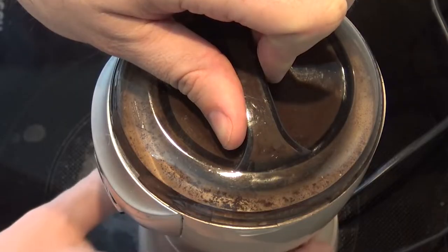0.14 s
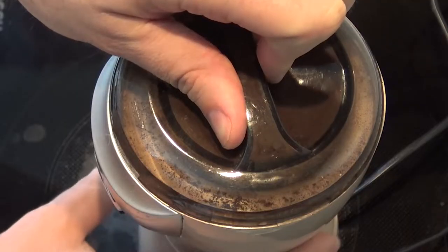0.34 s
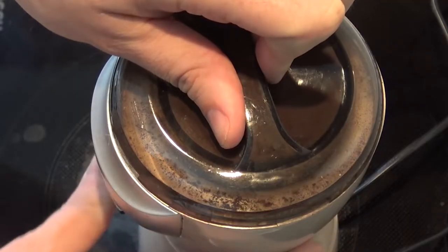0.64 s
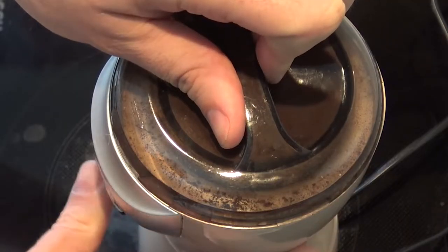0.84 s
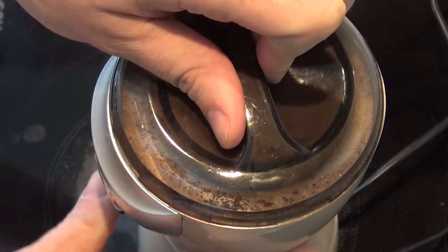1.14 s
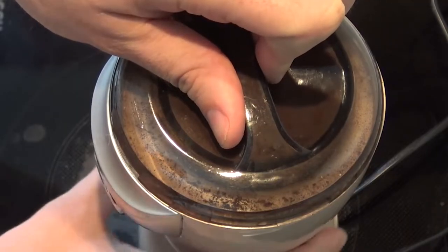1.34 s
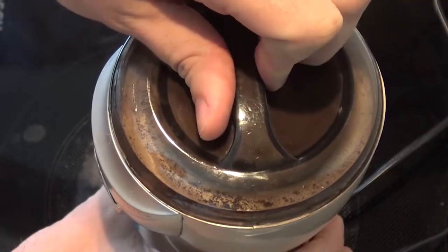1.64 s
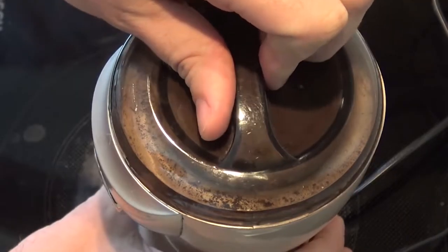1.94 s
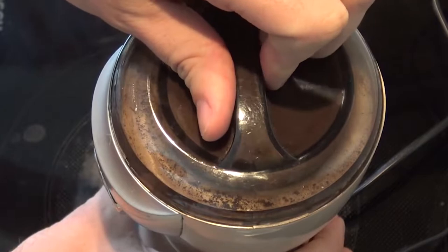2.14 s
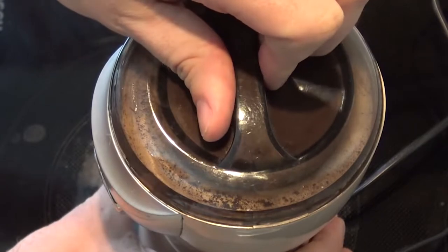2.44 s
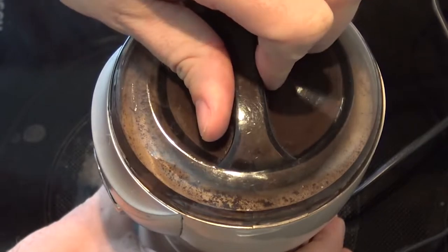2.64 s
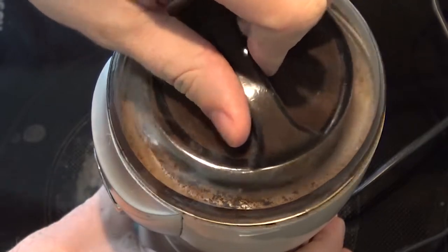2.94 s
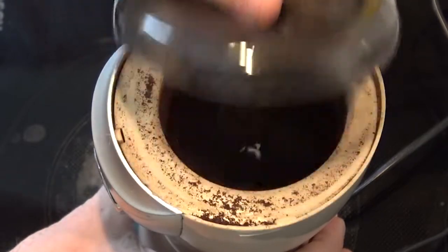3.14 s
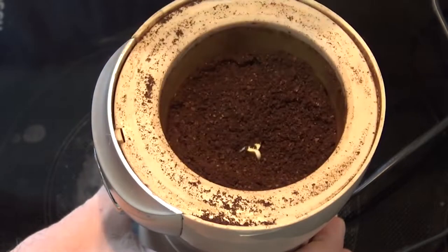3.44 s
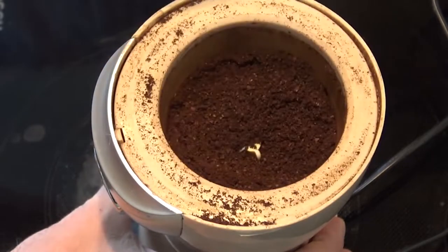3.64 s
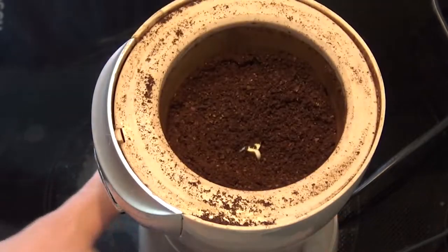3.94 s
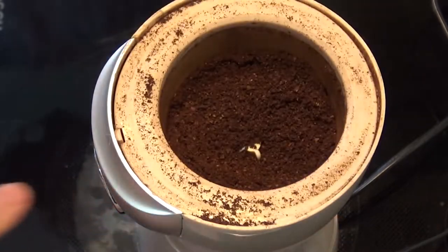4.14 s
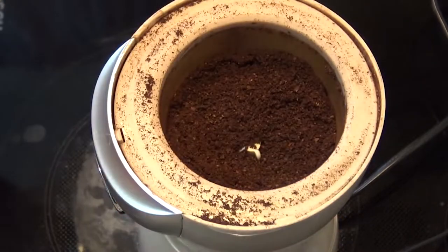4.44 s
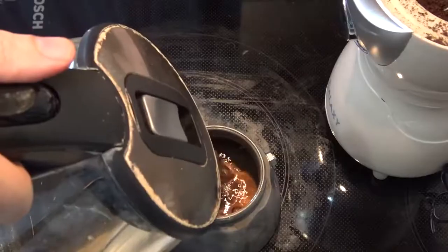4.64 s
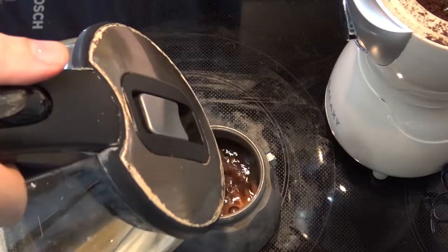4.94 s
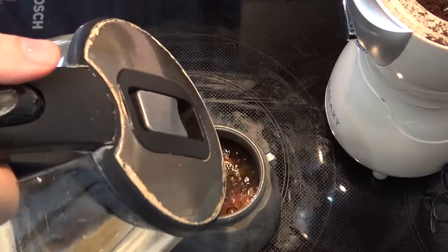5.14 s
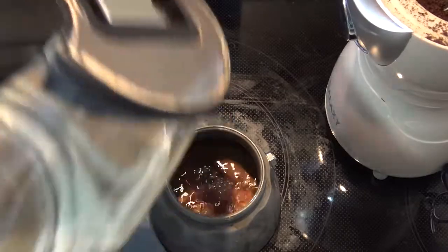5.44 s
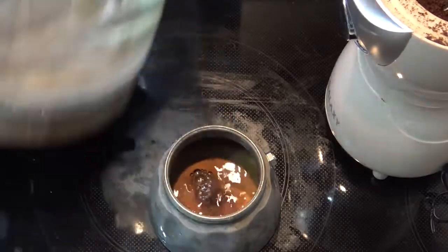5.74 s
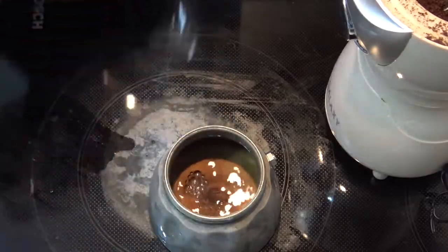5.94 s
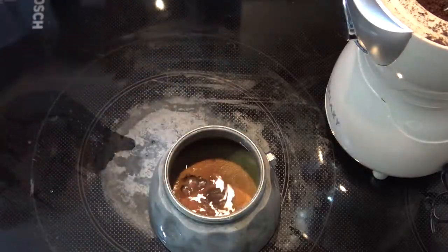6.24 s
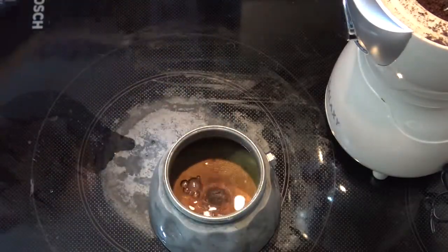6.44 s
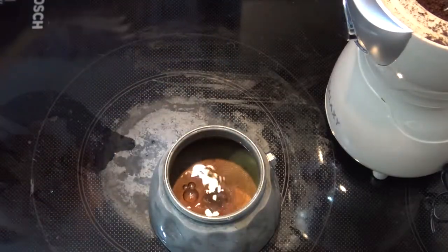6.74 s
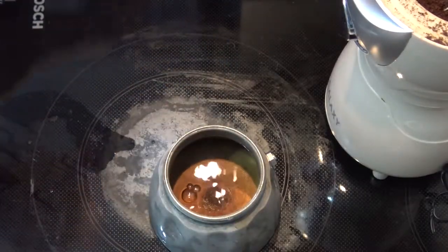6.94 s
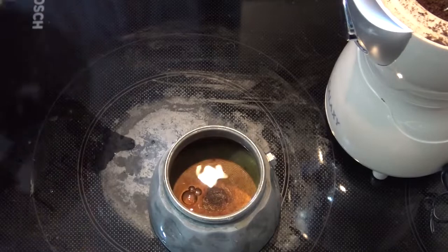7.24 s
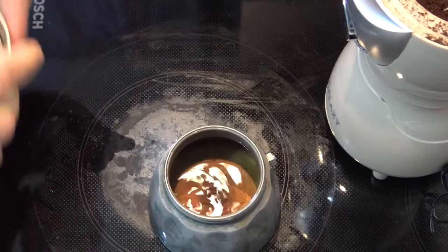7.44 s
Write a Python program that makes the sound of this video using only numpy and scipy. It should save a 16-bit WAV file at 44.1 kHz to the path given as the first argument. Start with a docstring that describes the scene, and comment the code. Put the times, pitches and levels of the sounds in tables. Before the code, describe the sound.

A small electric coffee grinder runs close to the microphone, humming and whining over gritty swirling grounds. It clicks off, rattles and winds down with knocks. Its plastic lid clicks free and is set down with a clack. Hot water splashes and plops into a small pot in two short bursts, fizzing lightly. A kettle lands with heavy, low knocks, followed by a very faint metallic slide. Small kitchen, short reverberation, low room noise.

```python
"""First a blade coffee grinder whirs close by, is switched off and coasts to a stop: shaft orders, gritty noise and knocks.
Its plastic lid is pulled off and laid down, as struck modes and a dusty drag.
Hot water is tipped from a kettle onto the grounds in a small pot: noise slaps and ringing bubbles splash, plop and fizz.
The kettle is set down with three heavy knocks, each with a softer rebound; then something metal slides faintly.
A small kitchen answers with early reflections and a diffuse tail, over low room noise and hiss."""
import sys
import numpy as np
from scipy import signal
from scipy.fft import rfft, irfft, next_fast_len
from scipy.io import wavfile
from scipy.ndimage import map_coordinates

SR = 44100
rng = np.random.default_rng(int(sys.argv[2]) if len(sys.argv) > 2 else 0)


def store_wav(level_fs):
    """Save 16-bit WAV to argv[1]."""
    pcm = np.round(np.clip(np.atleast_2d(level_fs), -1, 1) * 32767)
    wavfile.write(sys.argv[1], SR, pcm.T.astype(np.int16))


N = 335160
TIME = np.arange(N) / SR  # s, the whole scene
AGE = np.arange(SR // 2) / SR  # s, since a single sound began

# All table levels are relative: each layer is balanced further in the mix.
# Running grinder
OFF_S, SHAFT_HZ, MAINS_HZ = 1.563, 341.6, 50  # the switch opens; full speed; supply frequency
# whine of the shaft: order, level/dB
WHINE = [(4, -41.5), (5, -30.5), (6, -31.5), (8, -44), (10, -37), (12, -41), (14, -45), (20, -44),
         (30, -45.5)]
# orders shifted by the mains ripple: f/Hz, level/dB
SIDE_LINES = [(1125, -43.5), (1266, -49), (1466, -55), (1808, -56), (2150, -41.5), (2291, -43),
              (3174, -42.5), (3316, -41.5), (3516, -38), (3658, -46.5), (3858, -42)]
# hum of the unbalanced shaft: t/s, level/dB
UNBALANCE_HUM = [(0.03, -17.5), (0.33, -19), (0.89, -16.5), (1.048, -19), (1.446, -16), (1.53, -16)]
# colour of grounds flung round the cup: f/Hz, density/dB per Hz
SWIRL_COLOUR = [(25, -36.5), (42, -24.5), (62, -10.5), (110, -2.5), (260, -8), (470, -15.5), (700, -10.5),
                (900, -5.5), (1300, -6), (2100, -1), (2900, -5.5), (4800, -4), (7500, -13), (9500, -15.5),
                (13000, -12), (16000, -25.5)]
# resonances of the grinding cup: f/Hz, width/Hz, level/dB
CUP_RESONANCES = [(932, 200, -4), (1714, 122, -1.5), (2022, 210, -0.5), (3950, 420, -4.5),
                  (4900, 860, -4.5)]
BUZZ_START_S, BUZZ_LENGTH_S = .12, 1.302  # the body buzzes near the 2nd and on the 3rd order
SECOND_DB, THIRD_DB, THIRD_GROWS = -31.5, -31.5, 2.8  # the 3rd order swings wider than the hum, dB per dB
SWIRL_DB, SWIRL_GROWS = -22.5, 0.15  # flung grounds; growth in dB per dB of hum
# left-right tilt of the grinder: f/Hz, left minus right/dB
GRINDER_BALANCE = [(60, 2.0), (110, 3.5), (200, 0), (380, -1.5), (700, 2.5), (1290, 0), (2380, -1.0),
                   (4400, -2.0), (8120, 0), (15000, -1)]

# Coasting grinder
# colour of the rattle: f/Hz, density/dB per Hz
RATTLE_COLOUR = [(30, -30.5), (60, -13), (150, 3.5), (450, -1.5), (1000, 8.5), (1350, 0), (2150, 9.5),
                 (2700, 0.5), (4800, 3), (7000, -21), (16000, -44)]
# colour of the fine dust: f/Hz, density/dB per Hz
HISS_COLOUR = [(1500, -29), (4000, -4.5), (7000, 0.5), (8600, -2.5), (10000, -6), (13000, -5.5),
               (16000, -20)]
# resonances of the motor housing: f/Hz, width/Hz, level/dB
HOUSING_RESONANCES = [(275.7, 9.9, 1), (159, 11, -12.5)]
# first a burst of hiss as the switch is let go, then grounds collapse into the slowing blade:
# t/s, length/s, rattle level/dB, hiss level/dB
FLARES = [(1.558, 0.054, -25, -18), (2.001, 0.049, -29, -36.5), (2.076, 0.021, -28, -28.5),
          (2.215, 0.036, -40, -47.5)]
RATTLE_DB, RATTLE_EXPONENT = -26, 0.75  # level at full speed; gain goes with this power of the speed
HISS_DB, HISS_EXPONENT = -35, 0.85  # the same for the hiss
SHAKE_START_S, SHAKE_LENGTH_S = 1.59, .39  # the coasting shaft shakes the housing
FLARE_ATTACK_S, FLARE_T60_S = .003, .29
DRAG_PER_S, FRICTION_HZ_PER_S = .95, 207  # air drag and bearing friction slow the free shaft
JAM_S, JAM_HZ_PER_S = 2.0, 180  # from here the settling grounds brake it as well
COAST_ORDERS_DB, COAST_FALL_DB = -6, 3  # its 2nd order against the rattle; loss per further order

# Knocks and drags
# the switch clicks off at 1.565 s, the other rows are knocks in the cup:
# t/s, body level/dB, thud level/dB, crack level/dB, note f/Hz
GRINDER_HITS = [(.572, -38, -44, -23, 10400), (.892, -18.5, -52, -33.5, 1017),
                (1.268, -25, -46, -30.5, 4200), (1.565, -25.5, -45.5, -21, 1630),
                (1.912, -25.5, -34, -30.5, 4970), (2.005, -25.5, -36, -33.5, 2150),
                (2.079, -14.5, -23.5, -28.5, 990), (2.092, -16, -25, -21, 2080),
                (2.218, -32.5, -29, -43, 2170)]
# the lid slides, comes free and is laid down: t/s, body level/dB, thud level/dB, crack level/dB, note f/Hz
LID_HITS = [(2.784, -41, -50, -42.5, 2130), (2.819, -29.5, -42, -22, 2105), (2.834, -22, -39.5, -35, 1830),
            (2.884, -28.5, -55, -27, 2530), (2.905, -45, -46, -28, 7550), (2.918, -24.5, -35, -45.5, 634),
            (3.423, -13, -29.5, -34, 1015), (3.852, -50, -54, -49.5, 1010),
            (3.928, -42.5, -57, -45.5, 5880)]
# the kettle meets its base: t/s, body level/dB, thud level/dB, crack level/dB, note f/Hz
KETTLE_HITS = [(5.66, -41.5, -57, -79, 690), (6.198, -42.5, -61, -82, 740), (6.527, -18, -21.5, -30, 1335),
               (6.582, -26, -31, -48.5, 630), (6.65, -25, -28, -48, 874), (6.687, -9.5, -16, -26.5, 1446),
               (6.802, -10, -14.5, -22, 603), (6.821, -11.5, -25, -27.5, 1248), (6.957, -61, -57, -38, 673)]
# ringing modes of cup, lid and kettle: f/Hz, level/dB, t60/s before shortening in knocks()
CUP_MODES = [(62.7, -11.5, 0.67), (119.8, -2, .5), (269, -3, 0.58), (794, 1, 0.045), (1642, 9.5, 0.089)]
LID_MODES = [(123, -0.5, .35), (161, 5.5, 0.28), (270, -2, 0.23), (590, -11, 0.21), (984, -2, 0.07),
             (1144, -11, 0.071), (1290, -15, 0.09), (1665, -5, 0.092), (2170, -3, 0.11),
             (4230, -10.5, 0.12)]
KETTLE_MODES = [(111.1, -6, 1), (158.6, -0.5, 0.62), (235, 0.5, 0.23), (278, -1, 0.42), (1050, -13.5, 0.42),
                (2520, -18, 0.18)]
# noise colours of their impacts: f/Hz, density/dB per Hz
CUP_COLOUR = [(30, -31), (130, -5.5), (450, -13), (1000, -2.5), (2200, -10), (6000, -11.5), (13000, -9.5),
              (16000, -22)]
LID_COLOUR = [(47, -27), (80, -27.5), (271, -6), (461, -18.5), (575, -1.5), (802, -13.5), (1000, -1),
              (1200, -5), (2600, -7), (6170, -17.5), (6890, -11), (13100, -18.5), (16000, -25.5)]
KETTLE_COLOUR = [(25, -38), (40, -4), (65, 5), (150, -1.5), (250, 3), (420, -11.5), (1000, -14.5),
                 (2500, -20.5), (5000, -33.5), (10000, -43.5), (16000, -54)]
ROCK_S, ROCK_LOSS_DB = .03, 8.5  # the kettle rocks back once per knock, more softly; its crack loses twice this
# the lid's rim drags: t/s, length/s, level/dB
LID_DRAGS = [(2.779, .028, -45), (2.868, 0.043, -40.5)]

# Water
# water slaps into the pot: t/s, spray level/dB, dull slap level/dB
SPLASHES = [(4.5297, -11.5, -38), (4.5591, -15.5, -35.5), (4.6049, -21.5, -54), (5.0747, -17.5, -40),
            (5.1101, -29, -35), (5.1268, -24, -36), (5.1605, -22.5, -36)]
# colour of the spray: f/Hz, density/dB per Hz
SPRAY_COLOUR = [(880, -24.5), (1500, -9), (1760, -25.5), (2490, -19), (3810, -21.5), (6000, -14),
                (8000, -5.5), (11000, -11), (12200, -11), (16000, -17)]
# air pockets close, the last row is a clink of the kettle's spout or lid: t/s, level/dB, starting pitch f/Hz
PLOPS_AND_CLINK = [(4.558, -12, 1363), (4.575, -21, 1270), (4.606, -26.5, 1250), (4.705, -31, 1485),
                   (4.708, -36.5, 3450), (4.752, -34, 2040), (4.806, -22.5, 1397), (4.892, -27, 1390),
                   (4.923, -27, 1560), (4.962, -36, 3210), (4.979, -23, 1810), (5.112, -21.5, 1460),
                   (5.114, -24, 886), (5.129, -27, 2400), (5.16, -23, 1630), (5.362, -29, 2700)]
# the loudest droplets: t/s, level/dB, starting pitch f/Hz
DROPLETS = [(4.8015, -33.5, 4840), (4.8284, -30.5, 8900), (4.8863, -33.5, 6560), (4.9217, -27.5, 8940),
            (5.0634, -27, 7450), (5.1597, -29.5, 6090), (5.25, -37, 5450), (5.2669, -15, 9180),
            (5.7438, -40, 6630), (5.7848, -40, 6560)]
# gushes from the spout: t/s, length/s, bubble level/dB
GUSHES = [(4.562, 0.23, -48), (4.803, .14, -40.5), (5.106, .04, -35.5)]
# hollow of the pot: f/Hz, width/Hz, level/dB
POT_RESONANCES = [(994, 140, 2), (3320, 70, 5.5), (6200, 170, 4)]
TRICKLE_HZ, TRICKLE_OCTAVES = 1740, 0.371  # middle and spread of the bubbles in a gush
FOAM_HZ, FOAM_OCTAVES, FOAM_DB = 7800, .2, -6.5  # bursting foam; its level against its gush
FOAM_DELAY_S, FOAM_LIFE_S, FOAM_FADE_DB_PER_S = .06, 1.3, 12

# Sliding metal
# a metal part slides: t/s, length/s, level/dB
SCRAPES = [(7.261, 0.016, -51), (7.345, 0.023, -54.5)]
# resonances of that part: f/Hz, width/Hz, level/dB
METAL_RESONANCES = [(1424, 68, 4.5), (5020, 140, -7), (7500, 230, -10.5), (10200, 500, -16.5)]

# Room
# decay of the kitchen tail: f/Hz, t60/s
KITCHEN_DECAY = [(60, 0.93), (120, 0.29), (300, 0.45), (1000, 0.32), (3000, 0.36), (8000, .33),
                 (16000, 0.17)]
# colour of the room noise: f/Hz, density/dB per Hz
ROOM_TONE = [(15, -50.5), (25, -18.5), (53, -3), (114, 1), (166, -4.5), (249, -1.5), (317, -10.5),
             (516, -9), (796, -13), (1440, -16), (2280, -21.5), (2840, -18), (3080, -20.5), (7510, -20),
             (16000, -23.5)]
AIR_DROP_S = 4.45  # the low room noise drops here
AIR_BEFORE_DB, AIR_AFTER_DB, AIR_HISS_DB = -52, -57, -62  # room noise before and after; its steady treble
RUMBLE_START_S, RUMBLE_DB, RUMBLE_T60_S = 6.69, -50.5, 5.9  # a low rustle lingers as the kettle lands
TOP_HZ = 16100  # upper band limit of the whole mix


def grinding():
    """The unbalanced shaft hums, its orders whine, and the blade flings grounds round the cup."""
    hum_db = np.interp(TIME, *np.transpose(UNBALANCE_HUM))
    load_db = hum_db - hum_db[TIME < OFF_S].mean()
    turn = 2 * np.pi * np.cumsum(SHAFT_HZ * (1 + 0.00059 * wobble(20))) / SR
    torque = 2 * np.pi * 2 * MAINS_HZ * TIME  # the motor pulls on each half wave of the mains

    def line(order, db, waver_db):
        """One shaft order, wavering in level and phase."""
        phase = order * turn + 0.15 * wobble(40) + rng.uniform(0, 2 * np.pi)
        return amp(db + waver_db * wobble(5.58)) * np.sin(phase)

    lines = [(round(order), db) for order, db in WHINE]
    lines += [(hz / SHAFT_HZ, db) for hz, db in SIDE_LINES]
    whine = sum(line(order, db, waver_db=2.2) for order, db in lines)
    second = line(1.998, SECOND_DB, waver_db=1.0)
    third = line(3, THIRD_DB + THIRD_GROWS * load_db, waver_db=1.9)
    buzz = swell(BUZZ_START_S, BUZZ_LENGTH_S, attack=0.15, t60=0.45) * (second + third)
    tone = np.sqrt(2) * (amp(hum_db) * np.sin(turn) + whine + buzz)

    sweep = 1 + 0.12 * np.cos(turn) + 0.037 * np.cos(2 * turn) + 0.11 * np.cos(torque)
    spray = noise(SWIRL_COLOUR) * sweep
    ring = in_cup(grit(rate=4500, spread_db=1.5) * sweep) * amp(1.6 * wobble(22))
    swirl_level = amp(SWIRL_DB + SWIRL_GROWS * load_db + 0.53 * wobble(30))
    grounds = swirl_level * (amp(-2.5) * spray + amp(-9) * ring)
    return (tone + grounds) * np.clip((OFF_S - TIME) / 0.004, 0, 1)


def coasting():
    """The shaft slows; rattle and hiss fade with its speed, flaring at switch-off and as grounds collapse."""
    speed = coasting_speed()
    turn = 2 * np.pi * np.cumsum(SHAFT_HZ * speed) / SR
    shaking = swell(SHAKE_START_S, SHAKE_LENGTH_S, attack=0.053, t60=0.077)
    shake = shaking * np.sin(turn)
    # the hum swells as it passes each housing resonance, then beats against its ring
    hum = amp(-23.5) * shake + amp(-10) * filtered(shake, lambda hz: resonances(HOUSING_RESONANCES, hz))

    orders = np.zeros(N)
    for order in range(2, 8):
        level = amp(COAST_ORDERS_DB - COAST_FALL_DB * (order - 2) + 5.1 * wobble(28.03))
        orders += level * np.sin(order * turn + rng.uniform(0, 2 * np.pi))

    sweep = 1 + 0.13 * np.cos(turn)
    cup_ring = in_cup(grit(rate=1400, spread_db=1.5) * sweep)
    rattle = amp(-1.5) * noise(RATTLE_COLOUR) * sweep + amp(-6.5) * cup_ring
    hiss = noise(HISS_COLOUR) * (1 + 0.1 * np.cos(turn))

    # speed noise and flares add as powers
    rattle_power = (amp(RATTLE_DB) * speed ** RATTLE_EXPONENT) ** 2
    hiss_power = (amp(HISS_DB) * speed ** HISS_EXPONENT) ** 2
    for s, length, rattle_db, hiss_db in FLARES:
        flare = swell(s, length, FLARE_ATTACK_S, FLARE_T60_S)
        rattle_power = rattle_power + (amp(rattle_db) * flare) ** 2
        hiss_power = hiss_power + (amp(hiss_db) * flare) ** 2
    whole = hum + np.sqrt(rattle_power) * (rattle + orders * shaking) + np.sqrt(hiss_power) * hiss
    return whole * np.clip((TIME - OFF_S) / 0.0018, 0, 1)


def coasting_speed():
    """The shaft's share of full speed under air drag, bearing friction and settling grounds."""
    creep_hz = FRICTION_HZ_PER_S / DRAG_PER_S
    free_hz = (SHAFT_HZ + creep_hz) * np.exp(-DRAG_PER_S * (TIME - OFF_S)) - creep_hz
    braking_hz = JAM_HZ_PER_S * np.maximum(TIME - JAM_S, 0)
    return np.clip((free_hz - braking_hz) / SHAFT_HZ, 0, 1)


def in_cup(x):
    """x through the resonances of the grinding cup, at rms 1."""
    return unit(filtered(x, lambda hz: resonances(CUP_RESONANCES, hz)))


def pouring():
    """Water slaps the grounds, traps air, throws droplets and leaves a fizzing foam; the kettle clinks once."""
    water = amp(-3) * bubbles(PLOPS_AND_CLINK, cycles=48.4, rise=0.13, froth=0.23)
    water += amp(-7) * bubbles(DROPLETS, cycles=180, rise=0.11, froth=0.66)
    for s, db, slap_db in SPLASHES:
        spray = amp(db - 7.5) * noise(SPRAY_COLOUR, size=len(AGE)) * fade(0.02, 0.00018)
        slap = amp(slap_db - 2) * band(rng.standard_normal(len(AGE)), 207, 360) * fade(0.095, 0.003)
        add(water, s, spray + slap)
    water += amp(-4.5) * bubbles(trickle_bubbles(count=18, spread_db=4.5), cycles=49, rise=0.11, froth=0.54)
    water += bubbles(foam_bubbles(count=46, spread_db=4.0), cycles=40, rise=0.2, froth=1.0)
    return water + filtered(water, lambda hz: resonances(POT_RESONANCES, hz))


def bubbles(rows, cycles, rise, froth):
    """A bubble rings for some cycles and rises in pitch, amid a froth of its neighbours."""
    track, age = np.zeros(N), AGE[:SR // 10]
    for s, db, hz in rows:
        life = cycles / hz
        pitch = hz * (1 + rise * np.minimum(age / life, 1))
        tone = np.sin(2 * np.pi * np.cumsum(pitch) / SR)
        neighbours = band(rng.standard_normal(len(age)), 1.17 * hz, 1.1 * hz)
        add(track, s, amp(db) * (tone + froth * neighbours) * fade(life, 0.00065)[:len(age)])
    return track


def trickle_bubbles(count, spread_db):
    """Rows (t/s, level/dB, f/Hz): each gush drags down bubbles for as long as it runs."""
    rows = []
    for s, length, db in GUSHES:
        size, pitch = rng.standard_normal((count, 2)).clip(-2, 2).T
        age = length * (np.arange(count) + rng.random(count)) / count
        rows += zip(s + age, db + spread_db * size, TRICKLE_HZ * 2 ** (TRICKLE_OCTAVES * pitch))
    return rows


def foam_bubbles(count, spread_db):
    """Rows (t/s, level/dB, f/Hz): each gush leaves foam that bursts ever more rarely and softly."""
    rows = []
    for s, _, db in GUSHES:
        size, pitch = rng.standard_normal((count, 2)).clip(-2, 2).T
        age = FOAM_LIFE_S * ((np.arange(count) + rng.random(count)) / count) ** 1.4
        level_db = db + FOAM_DB - FOAM_FADE_DB_PER_S * age + spread_db * size
        rows += zip(s + FOAM_DELAY_S + age, level_db, FOAM_HZ * 2 ** (FOAM_OCTAVES * pitch))
    return rows


def knocks(hits, modes, colour, body_db, thud_db, crack_db, ring_db, note_db, t60, thud_t60):
    """Each blow gives a thud, a clatter of dense modes, a crack, the object's ring and a note of its own."""
    track = np.zeros(N)
    for s, body, thud, crack, note_hz in hits:
        burst = noise(colour, size=len(AGE))
        sound = amp(body + body_db) * band(burst, 540, 3800) * fade(t60, 0.0008)
        sound += amp(thud + thud_db) * band(burst, 45, 475) * fade(thud_t60, 0.0029)
        sound += amp(crack + crack_db) * band(burst, 4230, 19000) * fade(0.7 * t60, 0.00024)
        sound += amp(body + note_db) * np.sin(2 * np.pi * note_hz * AGE) * fade(t60, 0.00044)
        for hz, db, ring_t60 in modes:
            # low modes follow the thud, the others the body
            force_db = thud if hz < 450 else body - 9
            swing = np.sin(2 * np.pi * hz * rng.normal(1, .01) * AGE) * rng.choice([-1, 1])
            level = amp(force_db + ring_db + db + rng.normal(0, 1.3))
            sound += level * swing * fade(.7 * ring_t60, 0.0016)
        add(track, s, sound)
    return track


def rocking(hits):
    """Every knock and its softer, duller rebound."""
    rebounds = []
    for s, body, thud, crack, hz in hits:
        softer = (body - ROCK_LOSS_DB, thud - ROCK_LOSS_DB, crack - 2 * ROCK_LOSS_DB)
        rebounds.append((s + ROCK_S, *softer, hz))
    return list(hits) + rebounds


def lid_slide():
    """The lid's rim drags over the coffee dust on the cup's edge, as grit in the lid's colour."""
    def lid_tone(hz):
        return amp(along(LID_COLOUR, hz)) * hz / (hz + 3500)

    dust = unit(filtered(grit(rate=3700, spread_db=2.5), lid_tone))
    return strokes(LID_DRAGS, attack=.018, t60=0.077) * dust


def scrape():
    """A light metal part slides twice, and its slips ring in a few resonances."""
    slips = grit(rate=1100, spread_db=4.5)
    ringing = unit(filtered(slips, lambda hz: resonances(METAL_RESONANCES, hz)))
    return strokes(SCRAPES, attack=.005, t60=.28) * ringing


def kitchen(x, early_db, late_db, side_db):
    """Counter and walls answer at once, then a diffuse tail; the ears differ most in the treble."""
    hz, t, z = signal.stft(rng.standard_normal((2, SR)), SR, nperseg=256)
    decay = amp(-60 * t / along(KITCHEN_DECAY, hz)[:, None])
    tail = signal.istft(z * decay, SR, nperseg=256)[1][:, :len(AGE)]
    early = rng.standard_normal((2, len(AGE))) * fade(0.065, .003)
    answer = amp(early_db) * early / np.linalg.norm(early[0])
    answer = answer + amp(late_db) * tail / np.linalg.norm(tail[0])
    mid, side = signal.fftconvolve(x[None], answer, axes=1)[:, :N]
    width = [(350, -10.0), (600, -11.0), (9000, -2)]  # f/Hz, level/dB
    side = filtered(side, lambda f: amp(side_db + along(width, f)))
    return x + mid + np.array([side, -side])


def background():
    """Low room noise that drops in level, a steady hiss, a faint narrow ringing until the drop; a late rustle."""
    before = np.clip((AIR_DROP_S - TIME) / 0.12, 0, 1)
    sing = band(rng.standard_normal(N), 2720, 2900) * before
    sing = unit(filtered(sing, lambda hz: 1 / (1 + ((hz - 2810) / 90) ** 2)))
    air = noise(ROOM_TONE)
    low = filtered(air, lambda hz: 1 / (1 + (hz / 3000) ** 2))
    level = amp(AIR_AFTER_DB + (AIR_BEFORE_DB - AIR_AFTER_DB) * before)
    rustle = amp(RUMBLE_DB) * swell(RUMBLE_START_S, 0, attack=.05, t60=RUMBLE_T60_S) * noise(ROOM_TONE)
    return level * low + amp(AIR_HISS_DB) * (air - low) + amp(-72.5) * sing + rustle


def amp(db):
    """Decibels to gain."""
    return 10 ** (np.asarray(db) / 20)


def unit(x):
    """x at rms 1."""
    return x / np.sqrt(np.mean(x ** 2) + 1e-20)


def along(points, hz):
    """(f/Hz, value) points read on a log frequency axis."""
    f, v = np.transpose(points)
    return np.interp(np.log(hz + 1), np.log(f + 1), v)


def wobble(rate):
    """A smooth random curve, rate knots a second."""
    knots = rng.standard_normal(int(N * rate / SR) + 4)
    return map_coordinates(knots, [TIME * rate])


def filtered(x, response):
    """x times a response of frequency."""
    n = x.shape[-1]
    m = next_fast_len(n + 8192)  # padding leaves room for the ring
    return irfft(rfft(x, m) * response(np.fft.rfftfreq(m, 1 / SR)), m)[..., :n]


def resonances(modes, f):
    """The summed response of (f/Hz, width/Hz, level/dB) modes."""
    return sum(amp(db) * 1j * f * w / (c * c - f * f + 1j * f * w) for c, w, db in modes)


def noise(spectrum, size=N):
    """Noise of rms 1 with the given colour."""
    return unit(filtered(rng.standard_normal(size), lambda hz: amp(along(spectrum, hz))))


def band(x, lo_hz, hi_hz):
    """One band of x with steep edges, at rms 1."""
    def response(hz):
        return 1 / np.sqrt((1 + (lo_hz / (hz + 1)) ** 8) * (1 + (hz / hi_hz) ** 8))

    return unit(filtered(x, response))


def grit(rate, spread_db):
    """Tiny impacts of uneven size, about rate a second, at rms 1."""
    struck = rng.random(N) < rate / SR
    return unit(struck * rng.standard_normal(N) * amp(spread_db * rng.standard_normal(N)))


def fade(t60, attack):
    """The envelope of something struck."""
    return amp(-60 * AGE / max(t60, .002)) * (1 - np.exp(-AGE / attack))


def swell(s, length, attack, t60):
    """An envelope that rises from s and starts to die away a length later."""
    rise = np.clip((TIME - s) / max(attack, 1 / SR), 0, 1)
    return rise * amp(-60 * np.maximum(TIME - s - length, 0) / t60)


def strokes(rows, attack, t60):
    """The summed envelopes of (t/s, length/s, level/dB) strokes."""
    return sum(amp(db) * swell(s, length, attack, t60) for s, length, db in rows)


def add(track, s, sound):
    """Mix a sound into a track at s seconds."""
    part = track[max(round(s * SR), 0):][:len(sound)]
    part += sound[:len(part)]


def scene():
    """Grinder, lid, water and kettle in the kitchen, each placed left or right by level."""
    grinder = kitchen(grinding() + coasting(), early_db=-19, late_db=-25, side_db=5.0)
    halves = np.array([[.5], [-.5]])  # left, right
    grinder = filtered(grinder, lambda hz: amp(along(GRINDER_BALANCE, hz) * halves))

    switch_and_cup = knocks(GRINDER_HITS, CUP_MODES, CUP_COLOUR, body_db=-1.5, thud_db=1, crack_db=-0.5,
                            ring_db=-1.5, note_db=0, t60=0.077, thud_t60=0.17)
    lid = knocks(LID_HITS, LID_MODES, LID_COLOUR, body_db=-8.5, thud_db=3, crack_db=-1.5,
                 ring_db=-4.5, note_db=-1.5, t60=0.045, thud_t60=0.13)
    handling = switch_and_cup + lid + lid_slide()
    handling = kitchen(handling, early_db=-7, late_db=-7.5, side_db=-12) * amp([[-.4], [.4]])

    water = kitchen(pouring() + scrape(), early_db=-4.5, late_db=-6.0, side_db=-10.5) * amp([[-.4], [.4]])

    kettle = knocks(rocking(KETTLE_HITS), KETTLE_MODES, KETTLE_COLOUR, body_db=-7, thud_db=3.5, crack_db=1.0,
                    ring_db=-6, note_db=-16, t60=0.082, thud_t60=0.13)
    setting_down = kitchen(kettle, early_db=-14.5, late_db=-3.5, side_db=-12.5) * amp([[.25], [-.25]])

    # noise in opposite polarity widens the room
    air = background() + amp(-70) * noise(ROOM_TONE) * np.array([[1], [-1]])
    return grinder + handling + water + setting_down + air


def record(dry):
    """Everything from the band limit upwards is cut away."""
    return filtered(dry, lambda hz: hz < TOP_HZ)


dry = scene()
out = record(dry)
store_wav(out)
```